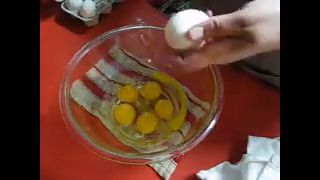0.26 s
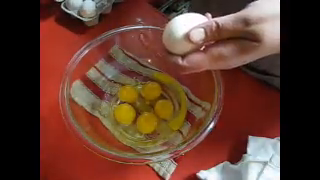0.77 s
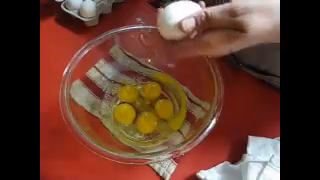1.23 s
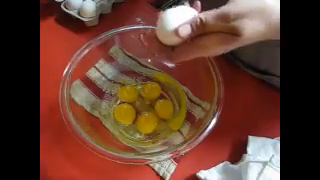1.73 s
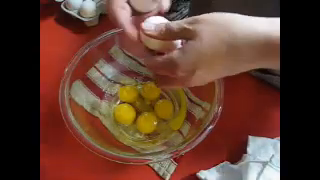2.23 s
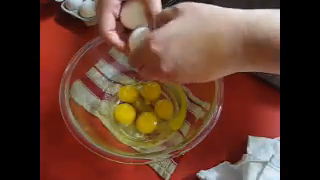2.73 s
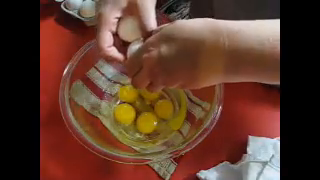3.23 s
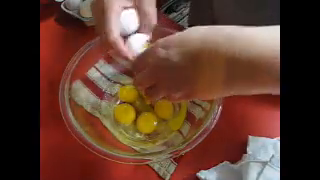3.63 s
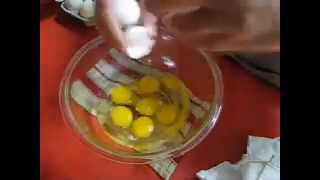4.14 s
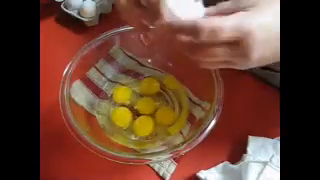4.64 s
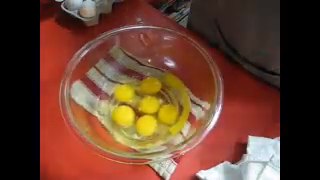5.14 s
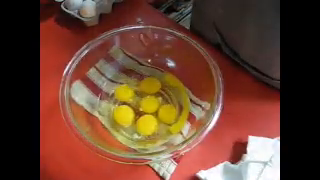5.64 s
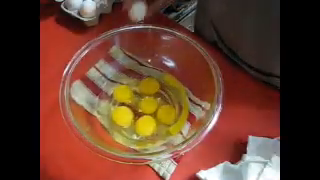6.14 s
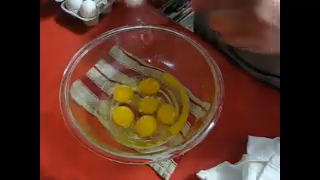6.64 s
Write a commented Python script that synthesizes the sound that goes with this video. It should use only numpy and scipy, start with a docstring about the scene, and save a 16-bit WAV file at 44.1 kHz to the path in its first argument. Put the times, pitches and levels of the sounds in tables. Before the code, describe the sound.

An egg is tapped three times on glass, crackles apart and plops; shells click, get tossed, and two knocks follow over a low steady hum.

```python
"""In a kitchen, an egg is tapped three times on the rim of a glass bowl, pulled open and plops onto other eggs.
A sleeve or hand brushes past, the empty halves click together and are tossed away; something knocks twice.
Hard contacts are sharp clicks followed by noise bursts, shaped by the pitches of shell, bowl or counter;
crackle and squelch are many tiny pops, and the brushing is a smooth swell of hiss just after the plop.
An appliance of wavering tones and noise hums throughout; gain control ducks everything after a loud blow."""
import sys
import numpy as np
from scipy import signal
from scipy.io import wavfile
from scipy.ndimage import uniform_filter1d

SR = 44100
rng = np.random.default_rng(int(sys.argv[2]) if len(sys.argv) > 2 else 0)


def to_wav(s):
    """Save 16-bit WAV."""
    ch = np.atleast_2d(s).T  # columns
    pcm = np.round(np.clip(ch, -1, 1) * 32767)  # PCM
    wavfile.write(sys.argv[1], SR, pcm.astype(np.int16))


N = 303849  # length in samples

# Egg on the rim. Each row: start in seconds, level in dB, graze before the break in dB against the tap,
# shell pitch in Hz, its overtone in dB, brightness in dB per octave, hollow sound of the bowl in dB.
TAPS = [(1.27, 2.5, -16.5, 1260, 9, -0.16, -14), (1.498, 6.5, -24, 1210, -7.5, 3, -27.5),
        (1.745, -3, -7, 870, -6.5, 2, -18)]
# Tone colour of a tap. Each row: frequency in Hz, level in dB.
TAP_COLOUR = [(60, -47), (120, -31), (230, -20), (370, -28), (480, -24), (620, -5), (900, 1.5), (2000, -2),
              (3000, -4), (5000, -0.5), (8000, -4.5), (12000, -8), (16000, -18.5)]
# Clearest tones of the glass bowl, damped by its contents.
# Each row: pitch in Hz, level in dB against the others, time to fall by 60 dB in seconds.
BOWL_TONES = [(1500, -19.5, 0.17), (1640, -12, .26), (3100, -4, 0.22), (4624, -6.5, .13), (6400, -5, 0.26),
              (6560, -5.5, .3)]
# Sound circling inside the bowl. Each row: frequency in Hz, level in dB.
BOWL_HOLLOW = [(100, -38.5), (700, -5.5), (1100, -7), (1550, -1), (2200, -6.5), (3000, -5), (5500, -7.5),
               (9000, -17.5), (16000, -30)]

# Clearest breaks of the shell under the thumbs. Each row: start in seconds,
# level in dB before a shared trim, pitch of the piece in Hz, treble in dB.
SNAPS = [(2.4644, -40.5, 2870, 3), (2.5605, -38.5, 2350, -4.5), (2.605, -33.5, 3250, -8.5),
         (2.6576, -34.5, 3820, -2), (2.7871, -40.5, 5030, 4), (2.8755, -36.5, 5330, 1),
         (2.9716, -31, 3220, 3), (3.0621, -23, 4270, 6.5), (3.0776, -22.5, 2510, -2),
         (3.0914, -32, 3150, -8), (3.1261, -26.5, 2860, -2.5), (3.156, -30.5, 5100, 18),
         (3.2986, -32, 3320, -1), (3.3243, -24.5, 3260, 3.5), (3.3557, -30, 3000, -7),
         (3.365, -26.5, 2800, 0), (3.3936, -26.5, 3100, -10), (3.4281, -26, 2600, -1),
         (3.4502, -26.5, 3170, -7.5), (3.5057, -21, 2840, -15), (3.519, -28.5, 2960, -18),
         (3.552, -32, 2970, 4), (3.581, -32, 5850, 1), (3.6326, -31.5, 2650, -4), (3.739, -31, 3790, -3.5),
         (3.7502, -20.5, 3950, -8.5), (3.77, -30, 4150, -4), (3.7826, -27.5, 2900, -2.5),
         (3.8087, -31.5, 2820, 0), (3.9553, -28.5, 4160, 0.5)]
# Tone colour of breaking shell. Each row: frequency in Hz, level in dB.
SNAP_COLOUR = [(100, -20.5), (600, -21), (1400, -5.5), (2600, -1.5), (4500, -1), (6500, -3), (10000, -7),
               (16000, -16)]
# Tone colour of the wet white. Each row: frequency in Hz, level in dB.
SQUELCH_COLOUR = [(200, -16.5), (480, -6), (700, 4.5), (1000, -15), (1550, -16), (2100, -5), (5000, -8),
                  (16000, -51)]
# Thumbs pressing into the crack. Values: peak in seconds, rise in seconds, fall in seconds.
PRESS = (3.16, 0.19, 0.38)
# Halves standing apart with white between them. Values: peak, rise and fall, all in seconds.
GAP = (3.55, 0.22, 0.065)
# Raw white stretching and sucking as the shell gives way. Values: peak, rise and fall, all in seconds.
STRETCH = (3.33, 0.011, 0.13)
# Fingers shifting their grip on the shell. Each row: middle in seconds, half length in seconds, level in dB.
RUBS = [(1.185, 0.027, -58.5), (2.123, 0.12, -49.5), (2.66, 0.085, -50), (4.463, 0.1, -57),
        (5.406, 0.39, -60), (6.882, 0.04, -58.5)]

# Contents landing in the bowl. Each row: start in seconds, level in dB, splash time in seconds.
PLOPS = [(4.008, -40, 0.009), (4.013, -25.5, 0.0088), (4.019, -38.5, 0.0066)]
# Tone colour of a splash. Each row: frequency in Hz, level in dB.
PLOP_COLOUR = [(80, 2), (230, -2.5), (370, 20.5), (550, -6.5), (800, 7), (1400, 8.5), (2100, 6.5),
               (2800, 3), (6000, -2.5), (9500, 7), (16000, -9)]
# Note a splash leaves in the bowl. Each row: frequency in Hz, level in dB.
PLOP_RING = [(1000, -30), (1850, -18), (2080, 10.5), (2350, -17), (4000, -42.5)]
# A sleeve or hand brushing past. Values: peak, rise and fall, all in seconds.
BRUSH = (4.15, 0.054, 0.066)
# Tone colour of the brushing. Each row: frequency in Hz, level in dB.
BRUSH_COLOUR = [(200, -13.5), (1400, 1), (2050, 7), (2700, 3.5), (4700, 2), (7000, -8.5), (10000, -10),
                (16000, -23.5)]

# Empty halves knocking and scraping together. Each row: start in seconds, level in dB,
# scrape time in seconds, cup pitch in Hz, cup ring in dB (half of it goes to each of two close pitches).
CUPS = [(4.5274, -12.5, 0.0059, 2310, 25), (4.5394, -14, 0.0034, 2270, 42), (4.5444, -19, 0.0032, 2040, 36),
        (4.612, -18, 0.015, 2280, -18), (4.648, -20, 0.013, 1980, 22.5), (4.672, -17.5, 0.016, 2090, 19.5),
        (4.899, -27, 0.023, 2230, 32.5), (5.335, -37, 0.046, 2080, 29.5)]
# Tone colour of the cup edges. Each row: frequency in Hz, level in dB.
CUP_COLOUR = [(100, -15.5), (400, -3), (700, -9.5), (1300, -2.5), (2800, -0.5), (4000, -5.5), (5800, 1.5),
              (8000, -3.5), (10000, -3), (16000, -14.5)]
# Shell landing and tumbling further off. Each row: start in seconds, level in dB,
# pitch in Hz, ring of the landing in dB.
TOSS = [(5.7456, -4.5, 2560, -1.5), (5.846, -38, 2700, 10.5), (5.907, -23.5, 2850, 9.5),
        (5.992, -29, 1248, 6), (6.012, -27, 1120, 11.5)]
# Tone colour of the tossed shell. Each row: frequency in Hz, level in dB.
TOSS_COLOUR = [(80, -20.5), (260, 0), (550, -10.5), (900, -6.5), (1700, -3.5), (2700, -2.5), (4200, -7.5),
               (6000, -8), (10000, -14.5), (16000, -15.5)]
# Knocks on the counter. Each row: start in seconds, level in dB, contact time in seconds,
# brightness in dB per octave, thump pitch in Hz.
KNOCKS = [(6.1949, 8.5, 0.0033, -0.5, 168), (6.414, -1, 0.0066, -2.5, 143)]
# Tone colour of a knock. Each row: frequency in Hz, level in dB.
KNOCK_COLOUR = [(40, -22.5), (110, -5), (290, 0), (480, -14.5), (680, -6), (800, -4.5), (950, 2),
                (1400, -11), (2200, -4), (3200, -10.5), (5000, -12.5), (9000, -15.5), (16000, -16)]
# The counter's crowded ringing tones. Each row: frequency in Hz, level in dB.
COUNTER = [(60, -25), (140, 1.5), (300, -10), (480, -10.5), (880, -5.5), (1080, -9.5), (1340, 10.5),
           (1650, -1.5), (2100, 6.5), (2700, -19), (5000, -22), (16000, -42.5)]

# Motor tones of the appliance. Each row: pitch in Hz, level in dB.
HUM = [(59.2, -55.5), (86.1, -54.5), (209.9, -56.5), (335, -58.5), (366.1, -60.5)]
# Tone colour of its rush of air. Each row: frequency in Hz, relative level in dB per Hz.
AIR = [(12, -29.5), (20, -2.5), (77, -2.5), (113, -8.5), (198, -9), (270, -10.5), (357, -10.5),
       (410, -12.5), (759, -18.5), (1090, -20), (2670, -31), (6540, -37), (7950, -39), (14700, -44),
       (16000, -64)]
# Stereo width of scattered sound. Each row: frequency in Hz, side against middle in dB.
WIDTH = [(60, -23), (250, -18), (600, -11.5), (1200, -7.5), (2500, -4.5), (5000, -2), (15000, -4)]
# Fading of the room. Each row: frequency in Hz, time to fall by 60 dB in seconds.
ROOM = [(150, 0.24), (600, 0.3), (1600, 0.4), (4000, 0.29), (8000, 0.25), (15000, 0.19)]

HZ = np.fft.rfftfreq(4096, 1 / SR)  # frequencies of every spectrum
T = np.arange(SR // 4) / SR  # time axis of one short sound, in seconds
OCTAVES = np.log2(np.maximum(HZ, 200) / 2000)  # octaves above 2000 Hz, level below 200 Hz


def taps(lead_s=0.0018, crush_s=0.0031, crumble_db=-1.5, ring_db=-37, overtone=2.12):
    """The shell grazes the rim, then caves in; the bowl answers with a short hollow wash and a faint ring."""
    out = np.zeros((2, N))
    for s, db, graze_db, hz, overtone_db, tilt, hollow_db in TAPS:
        shell = read(TAP_COLOUR, HZ) + tilt * OCTAVES
        shell += resonance(hz, width_hz=310, db=4.5)
        shell += resonance(hz * overtone, width_hz=1500, db=overtone_db)
        graze = blow(shell, decay_s=0.0015, crumble_db=30.5)
        crush = blow(shell, crush_s, crumble_db, lump_db=2)
        hollow = wash(read(BOWL_HOLLOW, HZ) + tilt * OCTAVES, t60=0.26)
        bowl = gain_of(hollow_db) * hollow + gain_of(ring_db) * ring(BOWL_TONES)
        add(out, s - lead_s, gain_of(db + graze_db) * graze)
        add(out, s, gain_of(db) * (crush + bowl))
    return out


def opening(crinkle_db=-53, chips_db=-47.5, squelch_db=-42.5):
    """Clear snaps, small chips and fine crinkling under the thumbs, and the wet white between the halves."""
    press = swell(*PRESS)
    grip = sum(gain_of(db) * swell(s, half_s, half_s) for s, half_s, db in RUBS)
    crinkle = grains(SNAP_COLOUR, gain_of(crinkle_db) * press + grip,
                     per_s=830, spread_db=7.5, piece_hz=(2200, 10000))
    chips = grains(SNAP_COLOUR, gain_of(chips_db) * press,
                   per_s=28, spread_db=4.5, piece_hz=(2400, 5000), count=6)
    squelch = grains(SQUELCH_COLOUR, gain_of(squelch_db) * swell(*STRETCH),
                     per_s=420, spread_db=2, piece_hz=(550, 1800), count=5)
    return snaps() + crinkle + chips + squelch


def snaps(level_db=-5.5, shut_hollow_db=-8, open_hollow_db=20, ring_db=6, ring_share=0.7, overtone_db=6):
    """Each break rings a small piece of shell for a few milliseconds; as the halves part it gains a hollow note."""
    treble_from_hz = 2860  # the treble setting acts above this, in full from an octave higher
    run_on_s, run_on_db = 0.006, -12.5  # each crack runs a little further just after it starts
    out = np.zeros((2, N))
    highs = np.clip(np.log2((HZ + 1) / treble_from_hz), 0, 1)
    cavity = np.exp(-((HZ - 1480) / 450) ** 2)
    gaps = swell(*GAP)
    for s, db, hz, bright_db in SNAPS:
        # a dull snap is a large piece flexing, and rings more clearly than a bright splinter
        piece_ring_db = ring_db - ring_share * bright_db
        hollow_db = shut_hollow_db + open_hollow_db * gaps[round(s * SR)]
        piece = read(SNAP_COLOUR, HZ) + resonance(hz, width_hz=410, db=piece_ring_db)
        piece += highs * bright_db + cavity * hollow_db
        for late_s, less_db in (0, 0), (run_on_s * rng.uniform(0.56, 2.1), run_on_db):
            # no two pieces have the same shape, so each has a second note of its own
            shape = resonance(hz * rng.uniform(0.61, 1.95), width_hz=280, db=overtone_db)
            snap = blow(piece + shape, decay_s=0.0035, crumble_db=7.5, lump_db=4.5)
            add(out, s + late_s + 0.001245, gain_of(db + less_db + level_db) * snap)
    return out


def grains(spectrum, gain, per_s, spread_db, piece_hz, count=12):
    """Tiny random cracks or pops of uneven size, each kind with its own pitch, following a gesture."""
    pops = np.zeros((2, N))
    for hz in np.geomspace(*piece_hz, num=count):
        happens = rng.random(N) < per_s / count / SR
        size = gain_of(spread_db * np.minimum(rng.exponential(1, N), 4)) * happens
        piece = read(spectrum, HZ) + resonance(hz, width_hz=hz / 6, db=9)
        pop = blow(piece, decay_s=0.003, crumble_db=8.5)
        pops += signal.oaconvolve(size[None], pop[:, :1024], axes=1)[:, :N]
    return evened(pops) * gain


def plops(ring_db=-11):
    """Yolk and white slap into the liquid with a fine wet fizz and a short ring."""
    out = np.zeros((2, N))
    for s, db, splash_s in PLOPS:
        splash = blow(read(PLOP_COLOUR, HZ), splash_s, crumble_db=18)
        note = wash(read(PLOP_RING, HZ), t60=0.22)
        add(out, s, gain_of(db) * (splash + gain_of(ring_db) * note))
    return out


def brush(brush_db=-47):
    """A sleeve or hand brushing past: a smooth swell of hiss just after the plop."""
    hiss = colour(scattered(N), read(BRUSH_COLOUR, HZ))
    return evened(hiss) * gain_of(brush_db) * swell(*BRUSH)


def cups(tilt_db=2.0, contact_s=0.0069, knock_s=0.01, rise_share=0.48):
    """The hollow halves ring at two close pitches as their edges catch."""
    out = np.zeros((2, N))
    edge = read(CUP_COLOUR, HZ) + tilt_db * np.maximum(OCTAVES, 0)
    for s, db, scrape_s, hz, ring_db in CUPS:
        cup = resonance(hz * 0.933, width_hz=170, db=ring_db / 2)
        cup += resonance(hz * 1.076, width_hz=510, db=ring_db / 2)
        # a long scrape is mostly small contacts and starts softly, a short knock is mostly one
        crumble_db = 20 * np.log10(scrape_s / contact_s)
        rise_s = max(rise_share * (scrape_s - knock_s), 1 / SR)
        rise = np.minimum((T + 1 / SR) / rise_s, 1)
        add(out, s, gain_of(db) * rise * blow(edge + cup, scrape_s, crumble_db))
    return out


def toss(bright_hz=2400, tilt_db=2.0, rattle_tilt_db=-0.3, hollow_hz=335, rattle_ring_db=4):
    """The shell lands with a crunch and rolls to rest, a little to the right; lower touches are duller."""
    rattle_after_s, rattle_s, rattle_db = 0.013, 0.046, -10  # it rattles on after every touch
    out = np.zeros((2, N))
    for s, db, hz, ring_db in TOSS:
        shell = read(TOSS_COLOUR, HZ) + tilt_db * np.log2(hz / bright_hz) * OCTAVES
        landing = shell + resonance(hz, width_hz=hz / 4, db=ring_db)
        rolling = shell + rattle_tilt_db * OCTAVES
        rolling += resonance(hollow_hz, width_hz=56, db=14.5)
        rolling += resonance(hz, width_hz=hz / 8, db=ring_db + rattle_ring_db)
        crunch = blow(landing, decay_s=0.015, crumble_db=12.5, lump_db=-0.5)
        rattle = blow(rolling, rattle_s, crumble_db=8, lump_db=6)
        add(out, s, gain_of(db) * crunch)
        add(out, s + rattle_after_s, gain_of(db + rattle_db) * rattle)
    return from_right(out, level_db=0.5, count=4)


def knocks(ring_db=-8, scuff_db=-27, lead_s=0.0031, crumble_db=6):
    """A brief scuff, then a hard clack over the low thump and woody ring of the counter."""
    out = np.zeros((2, N))
    for s, db, contact_s, tilt, hz in KNOCKS:
        body = read(KNOCK_COLOUR, HZ) + tilt * OCTAVES
        thump = resonance(hz, width_hz=31, db=5)
        scuff = blow(body + 3 * OCTAVES, decay_s=0.004, crumble_db=22.0)
        clack = blow(body + thump, contact_s, crumble_db, lump_db=2)
        counter = gain_of(ring_db + tilt) * wash(read(COUNTER, HZ) + tilt * OCTAVES, t60=0.19)
        add(out, s - lead_s, gain_of(db + scuff_db) * scuff)
        add(out, s, gain_of(db) * (clack + counter))
    return out


def appliance(air_db=-42.25, waver=0.59):
    """Wavering motor tones in a dull rush of air, with a thin high whine."""
    t = np.arange(N) / SR
    whine = resonance(7870, width_hz=140, db=9.5)
    air = evened(colour(scattered(N), read(AIR, HZ) + whine))
    out = gain_of(air_db) * air
    knot_s = np.linspace(0, t[-1], 40)  # level and phase wander between 40 random points
    for hz, db in HUM:
        wander, drift = (np.interp(t, knot_s, row) for row in rng.standard_normal((2, 40)))
        tone = np.sin(2 * np.pi * hz * t + 0.12 * drift)
        out = out + gain_of(db) * np.sqrt(2) * (1 + waver * wander) * tone
    return out


def kitchen(x, build_s=0.002):
    """Diffuse reflections that build up quickly and fade at a different speed in each part of the spectrum."""
    hz, t, z = signal.stft(scattered(SR // 2), SR, nperseg=256)
    fade = gain_of(-60 * t / read(ROOM, hz)[:, None])
    tail = signal.istft(z * fade, SR, nperseg=256)[1]
    tail *= 1 - np.exp(-np.arange(tail.shape[1]) / SR / build_s)
    return convolve(x, tail / np.linalg.norm(tail[0]))


def blow(spectrum_db, decay_s, crumble_db, lump_db=4):
    """A sharp contact and a dying, lumpy burst, coloured by the body; its energy is that of rms 1 for 10 ms."""
    lumps = np.interp(T, T[::30], rng.standard_normal(len(T[::30])))
    envelope = gain_of(lump_db * lumps) * np.exp(-T / max(decay_s, 1e-4))
    burst = scattered(len(T), envelope)
    burst *= gain_of(crumble_db) / np.linalg.norm(burst[0])  # energy against the single contact
    burst[:, 0] += 1  # the contact itself
    return evened(colour(burst, spectrum_db)) * np.sqrt(0.01 / T[-1])


def wash(spectrum_db, t60):
    """Many overlapping tones that die away together as a band of noise."""
    return blow(spectrum_db, t60 / np.log(1000), crumble_db=30, lump_db=0)


def ring(modes):
    """Dying tones of a struck body, reaching each microphone in a slightly different phase."""
    out = np.zeros((2, len(T)))
    for hz, db, t60 in modes:
        phase = rng.normal(0, 0.5, (2, 1))
        out += gain_of(db - 60 * T / t60) * np.sin(2 * np.pi * hz * T + phase)
    return out


def resonance(hz, width_hz, db):
    """A body sounds louder near its own pitch: a peak about db above a flat spectrum, in dB."""
    off_pitch = (HZ ** 2 - hz ** 2) / (width_hz * (HZ + 1))
    return 10 * np.log10(1 + gain_of(db) ** 2 / (1 + off_pitch ** 2))


def scattered(size, envelope=1):
    """Noise at two close microphones: alike in the bass, different in the treble."""
    noise = rng.standard_normal((2, 1, size)) * envelope
    side_db = read(WIDTH, HZ)
    mid_db = -10 * np.log10(1 + gain_of(side_db) ** 2)  # keeps the total power even
    mid = colour(noise[0], mid_db)
    side = colour(noise[1], mid_db + side_db)
    return np.vstack([mid + side, mid - side])


def from_right(x, level_db, count):
    """A source to the right reaches the left microphone weaker and count samples later."""
    return np.array([np.roll(x[0], count), x[1]]) * gain_of([[-level_db / 2], [level_db / 2]])


def swell(peak_s, rise_s, fall_s):
    """A gesture that grows smoothly to 1 and fades again."""
    t = np.arange(N) / SR - peak_s
    return np.exp(-0.5 * (t / np.where(t < 0, rise_s, fall_s)) ** 2)


def colour(x, db):
    """Filters without sounding ahead of time, with the gain db at the frequencies HZ."""
    log_gain = np.log(gain_of(np.r_[db, db[-2:0:-1]]))
    response = np.fft.ifft(np.exp(np.conj(signal.hilbert(log_gain)))).real
    return convolve(x, response)


def convolve(x, response):
    """Passes each channel through a response, keeping the length."""
    return signal.fftconvolve(x, np.atleast_2d(response), axes=1)[:, :x.shape[1]]


def read(points, hz):
    """Reads a table between its points, on a log-frequency axis."""
    f, value = np.transpose(points)
    return np.interp(np.log(hz + 1), np.log(f + 1), value)


def gain_of(db):
    """Turns decibels into a gain."""
    return 10 ** (np.asarray(db) / 20)


def evened(x):
    """Scales a sound to an rms level of 1."""
    return x / np.sqrt(np.mean(x ** 2) + 1e-20)


def add(mix, s, sound):
    """Mixes a stereo sound in at time s, in seconds."""
    part = mix[:, round(s * SR):][:, :sound.shape[1]]
    part += sound[:, :part.shape[1]]


def scene():
    """Every source is heard directly and, except the appliance, through its own share of the room."""
    # each row: sound, gain into the room
    sources = [(taps(), gain_of(-22.5)), (opening(), gain_of(-13.5)), (plops() + brush(), gain_of(-6.0)),
               (cups(), gain_of(-15.0)), (toss(), gain_of(-5.0)), (knocks(), gain_of(-18))]
    direct = sum(x for x, wet in sources)
    room = kitchen(sum(x * wet for x, wet in sources))
    return direct + room + appliance()


def record(dry, threshold_db=-16, squeeze=0.68, recovery_db_per_s=11.5, edge_hz=15700):
    """Gain control drops at once and recovers slowly; the sharpest peaks clip; then the top treble is cut."""
    power = abs(uniform_filter1d((dry ** 2).mean(0), size=400))
    power_db = 10 * np.log10(power + 1e-12)
    cut_db = squeeze * np.maximum(power_db - threshold_db, 0)
    recovered = np.arange(N) / SR * recovery_db_per_s
    held_db = np.maximum.accumulate(cut_db + recovered) - recovered
    gain = gain_of(-uniform_filter1d(held_db, size=100))
    clipped = np.clip(dry * gain, -1, 1)
    low_pass = signal.firwin(255, edge_hz, window=("kaiser", 8), fs=SR)
    return signal.oaconvolve(clipped, low_pass[None], "same")


dry = scene()
out = record(dry)
to_wav(out)
```